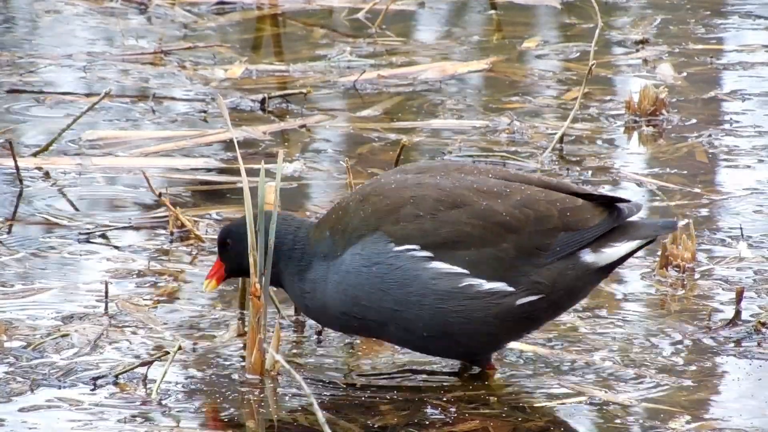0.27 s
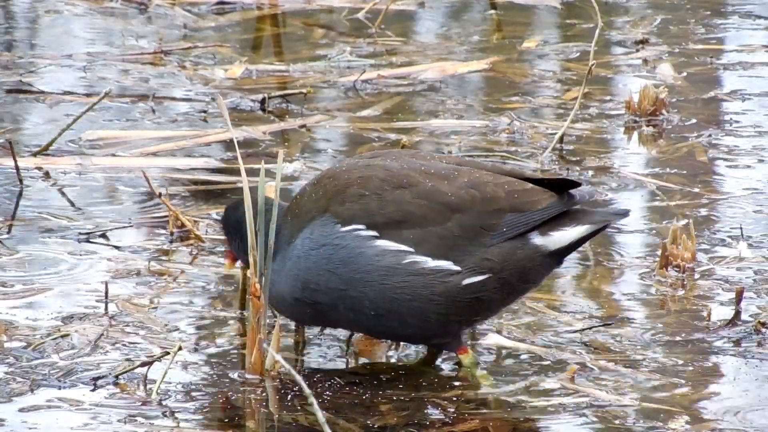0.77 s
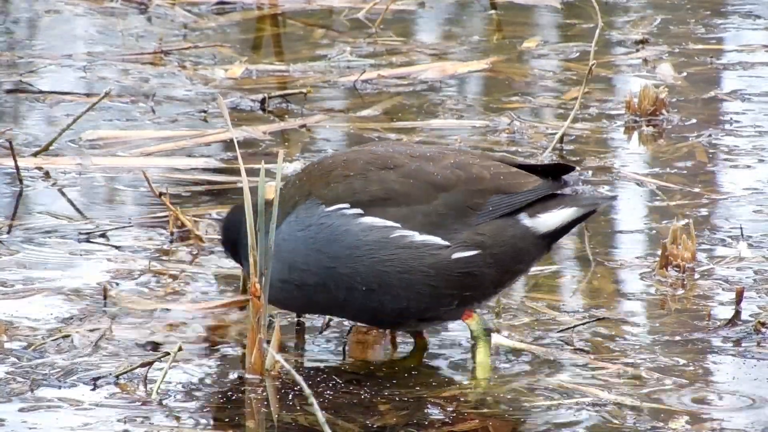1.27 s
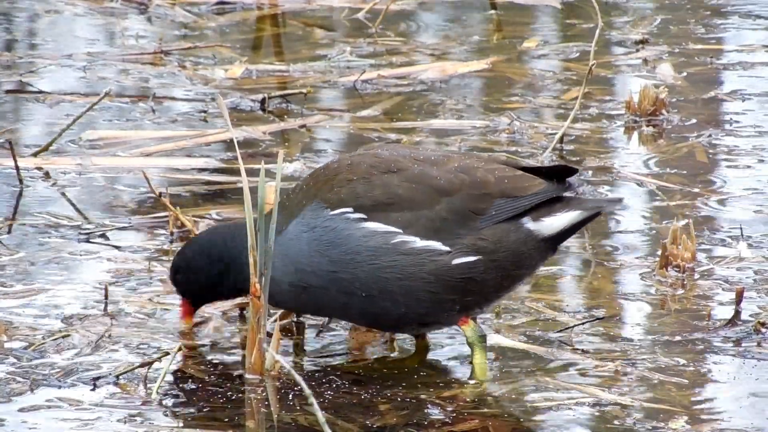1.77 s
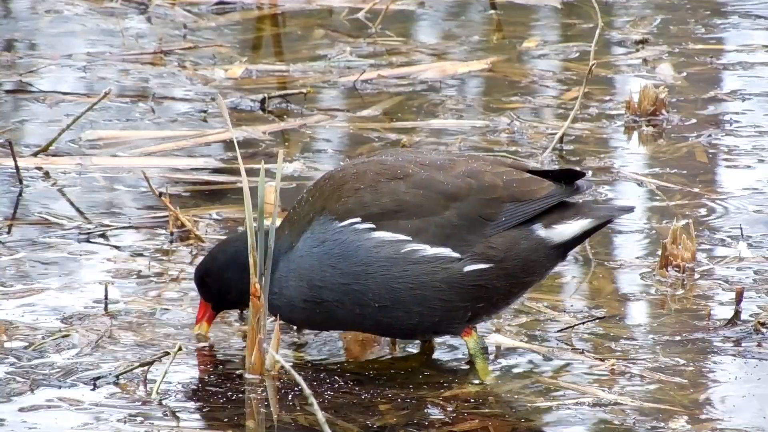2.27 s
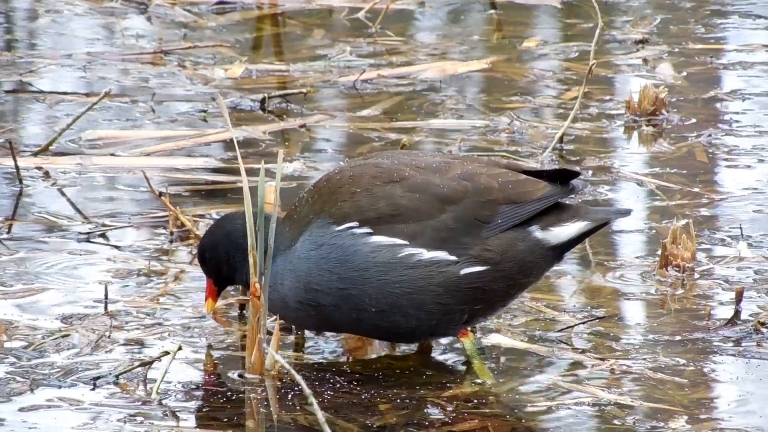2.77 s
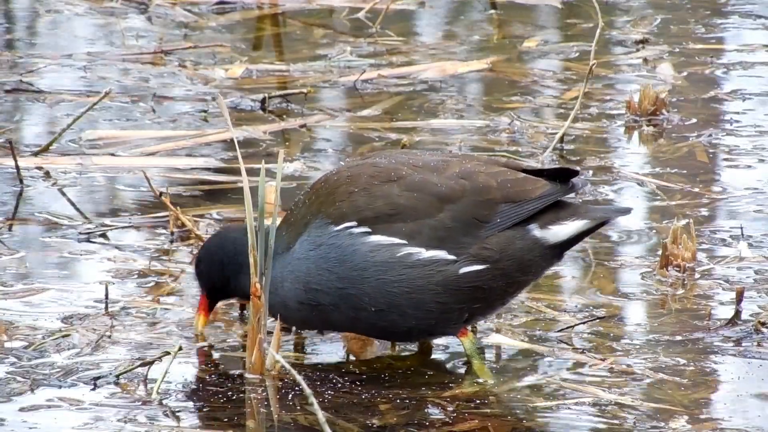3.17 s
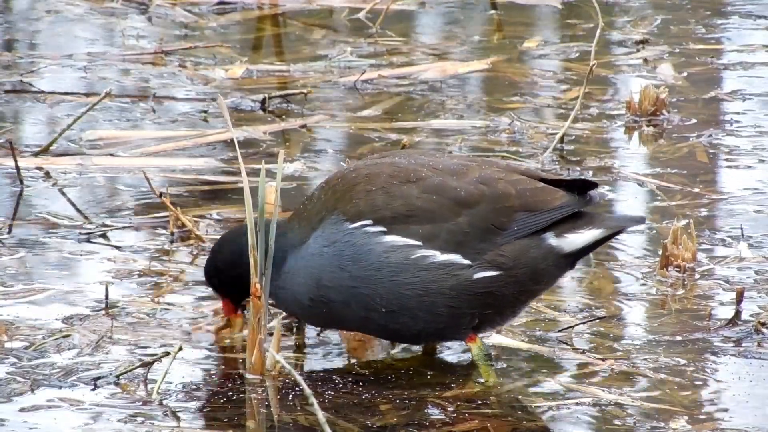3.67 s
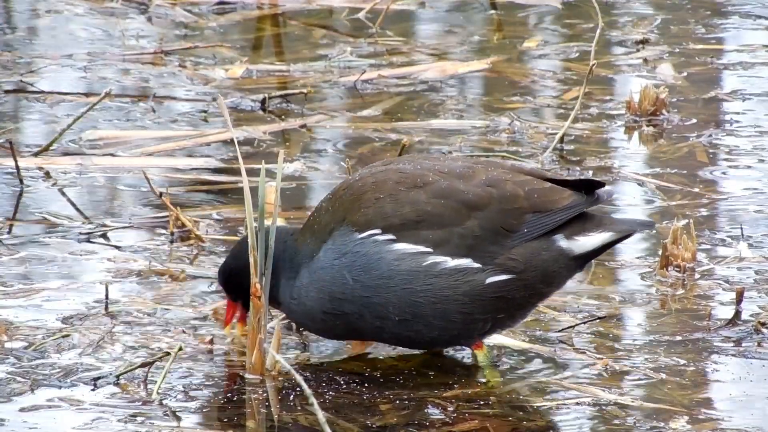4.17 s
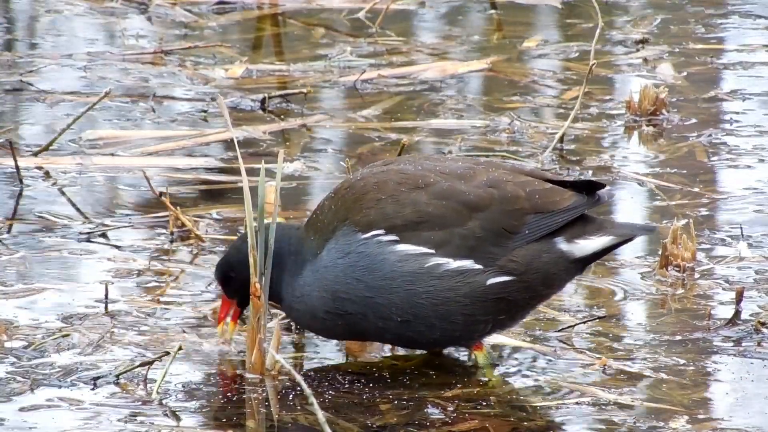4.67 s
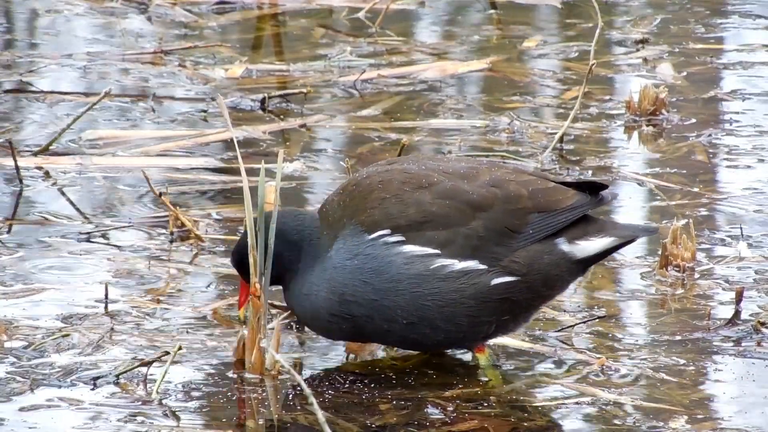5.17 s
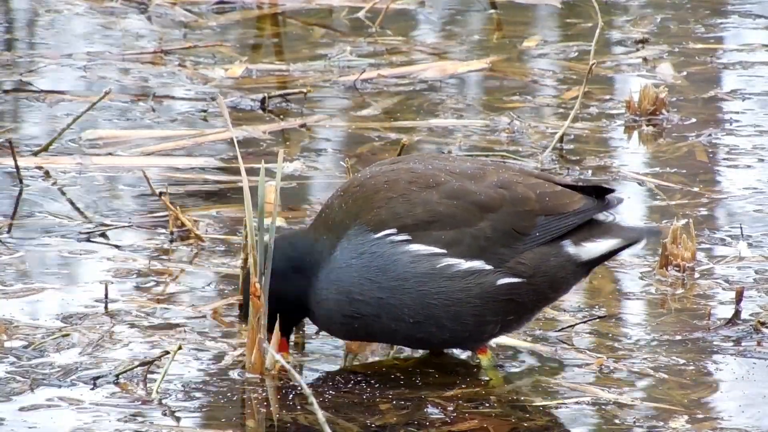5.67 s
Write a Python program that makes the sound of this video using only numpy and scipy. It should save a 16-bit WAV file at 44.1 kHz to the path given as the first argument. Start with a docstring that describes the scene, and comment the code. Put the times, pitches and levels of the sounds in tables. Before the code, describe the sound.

Three abrupt, raspy moorhen calls ring out beside a pond, with faint whistling and chipping songbirds to the right and quiet airy noise behind.

```python
"""Beside a pond, a moorhen close to the microphone gives three short, sharp trilled calls.
Each is a train of arched notes whose voice breaks down an octave; reeds, far bank and trees throw it back.
Small birds off to the right whistle, chip, twitter and warble with gliding tones, blurred by the branches.
Shaped noise makes a distant outdoor hush with a swelling hiss; a wind filter takes out the bass."""
import sys
import numpy as np
from scipy import signal
from scipy.fft import rfft, irfft, next_fast_len
from scipy.io import wavfile
from scipy.ndimage import uniform_filter1d

SR = 44100
rng = np.random.default_rng(int(sys.argv[2]) if len(sys.argv) > 2 else 0)


def wav_out(sig):
    """Save sig, one row per channel (or a flat mono array), as 16-bit PCM at SR to the path in sys.argv[1]."""
    wavfile.write(sys.argv[1], SR, np.round(np.clip(np.atleast_2d(sig).T, -1, 1) * 32767).astype(np.int16))


N = 260631
T = np.arange(N) / SR


def amp(db):
    """Decibels to gain."""
    return 10 ** (np.asarray(db) / 20)


def unit(x):
    """Scales to rms 1."""
    return x / np.sqrt(np.mean(x ** 2) + 1e-20)


def read(points, hz):
    """Reads a table of (frequency, value) on a log-frequency axis."""
    f, value = np.transpose(points)
    return np.interp(np.log(hz + 1), np.log(f + 1), value)


def shaped(x, response):
    """Filters by a response given as a function of frequency."""
    size = next_fast_len(x.shape[-1] + SR // 10)
    spectrum = rfft(x, size) * response(np.fft.rfftfreq(size, 1 / SR))
    return irfft(spectrum, size)[..., :x.shape[-1]]


def wobble(count, hz):
    """Straight glides between normal random values drawn hz times a second."""
    at = np.arange(count) * hz / SR
    return np.interp(at, np.arange(SR), rng.standard_normal(SR))


def ease(t, at_s, over_s):
    """A smooth step from 0 to 1."""
    return .5 + .5 * np.tanh((t - at_s) / (2 * over_s))


def tone(hz):
    """A sine that follows a changing pitch."""
    return np.sin(2 * np.pi * np.cumsum(hz) / SR)


def add(mix, s, sound):
    """Adds a sound at time s."""
    part = mix[max(round(s * SR), 0):][:len(sound)]
    part += sound[:len(part)]


def scatter(x, reflectors):
    """Many small reflections bunched around each reflector's delay, different at each ear."""
    t = T[:SR]
    taps = rng.standard_normal((2, SR)) * (rng.random((2, SR)) < .1)
    power = sum((amp(db) * np.exp(-abs(t - delay) / spread)) ** 2 for delay, spread, db in reflectors)
    taps = unit(taps * np.sqrt(power)) / np.sqrt(SR)
    return signal.fftconvolve(x[None], taps, axes=1)[:, :N]


def hush(level_db=-51.24, drift_db=0.22, lean_db=1.2, hiss_follow=0.55):
    """Distant outdoor noise, a little stronger on the right, with a high airy hiss that swells on top."""
    # spectrum of the distance, relative: (frequency [Hz], density [dB per Hz])
    distance = [(30, -42), (260, -25), (450, -24), (560, -4.5), (640, -6.5), (720, -2.5), (906, -1.5),
                (1170, -4), (1530, -11), (2090, -15), (3030, -10.5), (4020, -13), (6370, -20.5),
                (8500, -20.5), (11000, -24.5), (15800, -28.5)]
    # likeness of left and right: (frequency [Hz], correlation [-1 to 1])
    likeness = [(60, -0.19), (130, -0.24), (290, -0.45), (640, 0.88), (1410, 0.6), (3100, 0.36),
                (6820, -0.021), (15000, 0.15)]
    # swell of the hiss, heard relative to its median and scaled by hiss_follow: (time [s], level [dB])
    rustle = [(0.0, -68), (0.15, -62), (0.36, -66.5), (3.24, -69), (4.03, -65), (5.9, -66)]

    a, b = shaped(rng.standard_normal((2, N)), lambda f: amp(read(distance, f)))
    same = lambda f: np.clip(read(likeness, f), -1, 1)
    mid = shaped(a, lambda f: np.sqrt(1 + same(f)))
    side = shaped(b, lambda f: np.sqrt(1 - same(f)))
    air = np.array([mid + side, mid - side]) / np.std(mid)

    s, db = np.transpose(rustle)
    hiss = shaped(air, lambda f: read([(3500, 0.33), (6500, 0.91)], f))  # (frequency [Hz], share)
    swell = amp(hiss_follow * np.interp(T, s, db - np.median(db)))
    air = air + hiss * (swell - 1)
    return air * amp(level_db + drift_db * wobble(N, 4.3)) * amp([[-lean_db], [lean_db]])


def warble(from_s, to_s, level_db, per_s, glide=0.25, low_hz=2700, range_hz=2200):
    """Short gliding notes at random times, pitches and loudnesses."""
    out = np.zeros(N)
    for when, pitch, slope, length, loud in rng.random((round(per_s * (to_s - from_s)), 5)):
        u = np.linspace(-1, 1, int((.03 + .06 * length) * SR))
        hz = (low_hz + range_hz * pitch) * np.exp(glide * (2 * slope - 1) * u)
        note = tone(hz) * signal.windows.hann(len(u))
        add(out, from_s + when * (to_s - from_s), amp(level_db) * (.5 + loud) * unit(note))
    return out


def chorus(level_db=-63):
    """Many faint notes from birds deep in the trees, crowding together in spurts."""
    # bursts of quick warbled song, before the trees blur them: (from [s], to [s], level [dB])
    spurts = [(1.171, 1.848, -59), (4.42, 4.7, -70.5)]
    steady = warble(0, T[-1], level_db, per_s=8)
    return steady + sum(warble(*spurt, per_s=22) for spurt in spurts)


def chips(buzz_per_s=95, uneven=0.3, pulsing=0.49, wander=0.357):
    """A whistle swept upward again and again, pulsing in level with each sweep, gives a buzzy chip."""
    # chips from farther off, levels before the mix:
    # (time [s], length [s], centre [Hz], sweep scale either side [Hz], level [dB])
    chip_calls = [ (0.039, 0.075, 6400, 920, -60), (0.575, 0.034, 7230, 1850, -57.5),
                  (0.737, 0.064, 6200, 820, -59.5), (0.874, 0.055, 6800, 1800, -58.5),
                  (1.009, 0.048, 7300, 2220, -57), (1.168, 0.099, 4510, 1220, -53),
                  (1.3, 0.035, 3400, 780, -52.5), (1.376, 0.075, 3960, 1080, -52.5),
                  (1.524, 0.045, 3660, 770, -53), (1.602, 0.11, 3610, 1510, -53),
                  (1.809, .048, 5360, 810, -57), (2.125, .09, 5450, 1220, -54.5),
                  (3.835, 0.044, 5600, 446, -57), (4.453, 0.081, 4470, 920, -53),
                  (5.217, 0.063, 3110, 450, -47)]
    out = np.zeros(N)
    for s, length, centre, sweep, db in chip_calls:
        count = int(length * SR)
        cycle = np.cumsum(buzz_per_s * (1 + uneven * wobble(count, buzz_per_s))) / SR % 1
        saw = .8 * signal.sawtooth(2 * np.pi * cycle, .7)  # slow rise, quick return
        hz = centre + sweep * (saw + wander * wobble(count, 2 * buzz_per_s))
        gate = (1 + pulsing * np.sin(2 * np.pi * cycle)) * signal.windows.tukey(count, .3)
        add(out, s, amp(db) * unit(gate * tone(hz)))
    return out


def twitters(tick_s=0.0088, from_hz=3600, to_hz=5650, vary=0.092):
    """Each thin tick flicks upward and levels off; a run repeats it at a steady pace, pitch varying."""
    # runs of ticks, levels before the mix: (time [s], length [s], pace [ticks per s], level [dB])
    tick_runs = [(3.364, .16, 16, -57), (4.14, .22, 41, -54), (4.807, .2, 29, -53.5)]
    out, u = np.zeros(N), np.linspace(0, 1, int(tick_s * SR))
    hz = from_hz + (to_hz - from_hz) * np.sin(np.pi / 2 * u)
    for s, length, rate, db in tick_runs:
        for after, chance in zip(np.arange(0, length, 1 / rate), rng.standard_normal(size=16)):
            tick = tone(hz * (1 + vary * chance)) * signal.windows.tukey(len(u), .5)
            add(out, s + after, amp(db) * unit(tick))
    return out


def whistles(glide_power=1.6, waver=0.011, taper=0.34):
    """Pure, slightly wavering notes that leave their first pitch slowly, then glide ever faster."""
    # the small birds' clearest notes, levels before the mix:
    # (time [s], length [s], start pitch [Hz], end pitch [Hz], level [dB])
    whistled_notes = [ (0.682, 0.033, 4850, 4100, -60), (0.996, 0.077, 4110, 4430, -56.5),
                      (1.193, .06, 4050, 4500, -59.5), (1.39, .04, 5020, 3500, -65),
                      (1.446, 0.061, 3950, 4280, -49), (1.65, 0.095, 3640, 4290, -54),
                      (1.777, .04, 3560, 4770, -53.5), (1.873, 0.12, 3970, 3234, -55),
                      (2.07, 0.045, 2600, 3060, -62), (2.109, 0.026, 3180, 4130, -44.5),
                      (2.277, 0.051, 2980, 4270, -50), (2.428, 0.094, 4280, 4940, -64),
                      (2.459, 0.036, 3125, 3500, -54.5), (2.591, .042, 3260, 2850, -55.5),
                      (2.657, 0.012, 3380, 2590, -48), (3.06, 0.036, 4600, 2500, -55),
                      (3.115, 0.024, 2770, 3970, -52), (3.683, 0.045, 2850, 3440, -56.5),
                      (3.976, 0.026, 3200, 1850, -55.5), (4.015, 0.039, 2200, 3600, -51),
                      (4.45, 0.0314, 5100, 4610, -49.5), (4.528, .1, 4090, 3480, -56),
                      (4.636, 0.028, 3050, 2320, -56.5), (4.652, 0.046, 3530, 4150, -66),
                      (5.25, 0.036, 4880, 5370, -59.5), (5.43, 0.046, 3850, 5400, -57),
                      (5.587, 0.072, 3250, 5040, -58.5)]
    out = np.zeros(N)
    for s, length, first, last, db in whistled_notes:
        u = np.linspace(0, 1, int(length * SR))
        hz = first * (last / first) ** (u ** glide_power) * (1 + waver * wobble(len(u), 298))
        add(out, s, amp(db) * unit(tone(hz) * signal.windows.tukey(len(u), taper)))
    return out


def small_birds(whistle_db=0.0, whistle_wet_db=-3, chip_db=-3, chip_wet_db=-1, lean_db=5.0):
    """Birds off to the right, heard directly and through the branches; the chorus only through them."""
    # nearest branches, then the wood beyond: (delay [s], spread [s], relative level [dB])
    branches = [(.004, 0.03, 9), (0.042, .1, -7)]
    song, buzz = whistles(), chips() + twitters()
    direct = amp(whistle_db) * song + amp(chip_db) * buzz
    into_trees = amp(whistle_wet_db) * song + amp(chip_wet_db) * buzz + chorus()
    return (direct + scatter(into_trees, branches)) * amp([[-lean_db], [lean_db]])


def pond_echo(sent, echo_db=-17):
    """The call thrown back across the pond, coloured and spread in time."""
    # near reeds, far bank, trees behind it: (delay [s], spread [s], relative level [dB])
    bank = [(.028, .026, 5.5), (0.114, 0.043, 2), (0.311, 0.059, -13)]
    # colour of what comes back: (frequency [Hz], level [dB])
    echo_colour = [(700, 0.5), (1500, 0), (2000, -1), (2600, -3), (3400, -5.5), (4000, 5), (4800, -6.5),
                   (6200, -3.5), (8000, -1.5), (12000, -28)]
    return amp(echo_db) * scatter(shaped(sent, lambda f: amp(read(echo_colour, f))), bank)


def trill(top_hz, rate, level_db, broken_db, upper_db, treble_db, sag=.24, slack_sag=0.099, crest=0.522,
          pinch=0.74, attack=0.84, jitter=0.014, shimmer=.11, rasp_db=-28, broken_rasp_db=-20):
    """Arched notes an octave up, until the voice breaks, odd harmonics come in and the pitch sinks."""
    # colour of throat and bill: (frequency [Hz], level [dB])
    throat_colour = [(550, -11), (800, -2.5), (1000, 5.5), (1300, -4), (1700, 5), (2050, -1.5), (2400, 2.5),
                     (3000, 8.5), (3500, 0.5), (4100, -4), (4600, -9), (5400, -10.5), (6200, -18),
                     (6900, -16.5), (8200, -18.5), (10000, -20), (11000, -33), (12000, -23), (15000, -62)]
    # where the upper throat resonance acts: (frequency [Hz], share of its dB)
    upper_reach = [(2200, 0.15), (2800, 1), (4300, 1), (6000, 0.85)]
    # where the treble setting acts: (frequency [Hz], share of its dB)
    treble_reach = [(4400, 0.55), (5800, 1)]

    call_s, release_s = .084, 0.0054
    scoop_share, scoop_db, scoop_s = 0.165, -7, 0.00893  # starts flat and soft, comes up this fast
    fall_share, fall_at_s, fall_s = .21, .053, 0.00747  # then the voice slackens and loses pitch
    odd_db, broken_odd_db = -21.5, -1  # odd harmonics before and after the break
    slack_upper_db, slack_treble_db = -21, -8  # change in each as the colour dulls
    first_note = 0.81  # the first note fills only this share of its beat

    t = np.arange(0, call_s, 1 / SR)
    scoop = np.exp(-t / scoop_s)
    broken = ease(t, at_s=0.04, over_s=0.0013)
    dull = ease(t, at_s=0.049, over_s=0.007)
    tension = 1 - scoop_share * scoop - fall_share * ease(t, fall_at_s, fall_s)
    beats = np.cumsum(rate * tension ** 1.56) / SR  # the trill slows with the pitch
    u = beats % 1

    opening = np.sin(np.pi * np.minimum(u / first_note, 1)) ** 2
    later = 1 - pinch + pinch * np.sin(np.pi * u ** attack) ** 2
    swell = np.where(beats < 1, opening, later)
    call_db = level_db + (broken_db - level_db) * broken + scoop_db * scoop
    effort = uniform_filter1d(swell, size=40) * amp(call_db)
    effort = effort * np.minimum((call_s - t) / release_s, 1)

    arch = 1 - (sag + (slack_sag - sag) * dull) * (2 * (u - crest)) ** 2
    hz = top_hz * tension * uniform_filter1d(arch, size=30) * (1 + jitter * wobble(len(t), 2500))
    phase = 2 * np.pi * np.cumsum(hz) / SR
    odd = odd_db + (broken_odd_db - odd_db) * broken
    upper, treble = upper_db + slack_upper_db * dull, treble_db + slack_treble_db * dull
    rasp = amp(rasp_db) + amp(broken_rasp_db + np.minimum(odd, 0))  # the broken voice is hoarser

    voice = np.zeros(len(hz))
    for k in range(1, 15):
        f = k * hz
        throat_db = read(throat_colour, f) + upper * read(upper_reach, f) + treble * read(treble_reach, f)
        noise = wobble(len(hz), 1200) + 1j * wobble(len(hz), 1200)
        skirt = rasp * np.sqrt(k / 2) * noise  # noise around each harmonic
        harmonic = (amp(odd * (k % 2)) + skirt) * np.exp(1j * k * phase)
        voice += amp(throat_db) * harmonic.imag
    shared = np.sqrt(1 + amp(odd) ** 2)  # the same effort is spread over twice the harmonics
    return effort * voice / shared * (1 + shimmer * wobble(len(hz), 600))


def moorhen():
    """The calls as heard close by, and as sent across the pond; the share depends on where the head points."""
    # one row a call; pitch is that of the broken voice, levels are ahead of the throat colour:
    # (time [s], level sent to the far bank [dB], top pitch [Hz], pace at top pitch [notes per s],
    #  level before the break [dB], level after [dB], upper throat [dB], treble [dB])
    moorhen_calls = [(0.1553, 1.5, 1065, 116.8, -17.5, -16.5, 3.5, 4.5),
                     (2.8119, -2.5, 1052, 116.1, -13.5, -15.6, 9, 3.5),
                     (5.1183, 4.5, 1014, 113.5, -21, -21.5, 7, 1.5)]
    direct, sent = np.zeros((2, N))
    for s, sent_db, *row in moorhen_calls:
        call = trill(*row)
        add(direct, s, call)
        add(sent, s, amp(sent_db) * call)
    return direct, sent


def at_microphone(call):
    """Sound from the moorhen's direction reaches left and right with different level and phase."""
    # balance of the two sides: (frequency [Hz], left minus right [dB])
    call_balance = [(60, -2), (110, -13), (200, -11), (380, 3), (700, -4), (1290, -1.5), (2380, -2),
                    (4400, -0.5), (8120, 6), (15000, -1)]
    # phase between the sides: (frequency [Hz], left lead [rad])
    call_phase = [(4400, 0.5), (5600, 2.55), (6400, 1.5), (7600, 2.4), (8300, 1.5), (10300, 1.5),
                  (12000, 4)]
    ears = np.array([[.5], [-.5]])  # half the difference goes to each side
    level = lambda f: amp(ears * read(call_balance, f))
    turn = lambda f: np.exp(1j * ears * read(call_phase, f))
    return shaped(call, lambda f: level(f) * turn(f))


def scene():
    """The moorhen close by, its echo, the small birds off to the right and the outdoor hush."""
    call, sent = moorhen()
    birds = small_birds()
    return at_microphone(call) + pond_echo(sent) + birds + hush()


def record(dry):
    """A steep wind filter takes out the bass; then a low-pass limits the band."""
    # wind filter: (frequency [Hz], level [dB])
    low_cut = [(20, -39), (200, -31), (400, -22.5), (480, -22), (560, -19), (660, -3.5), (800, -1)]
    edge_hz = 15850
    cut = shaped(dry, lambda f: amp(read(low_cut, f)))
    low_pass = signal.firwin(511, edge_hz, window=("kaiser", 9), fs=SR)
    return signal.oaconvolve(cut, low_pass[None], "same")


dry = scene()
out = record(dry)
wav_out(out)
```